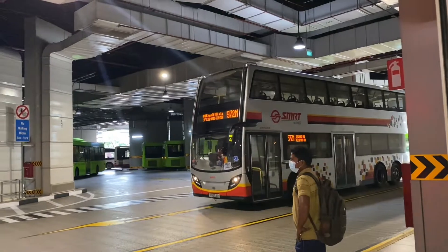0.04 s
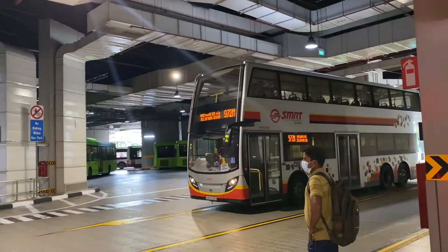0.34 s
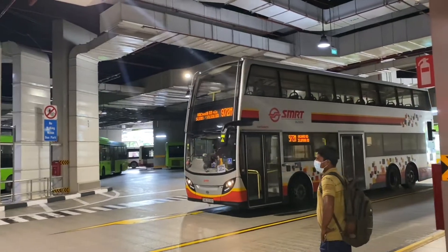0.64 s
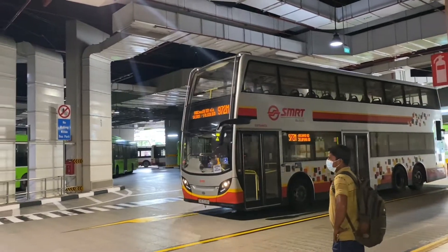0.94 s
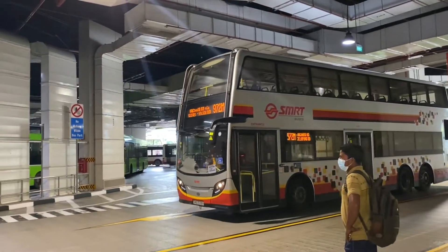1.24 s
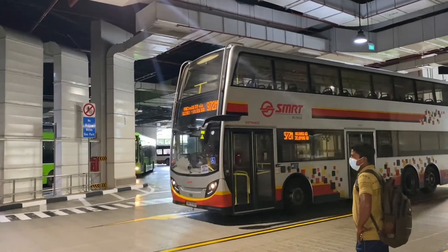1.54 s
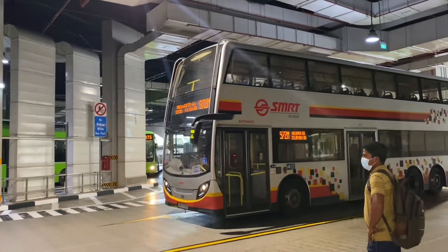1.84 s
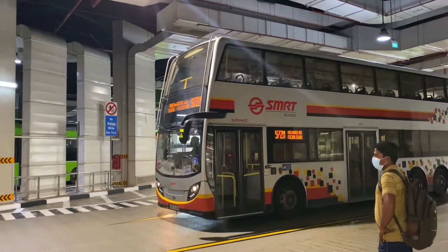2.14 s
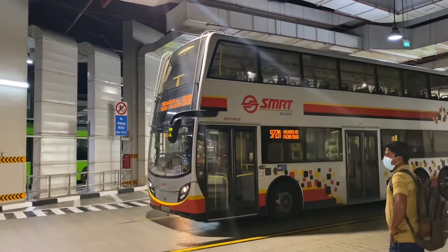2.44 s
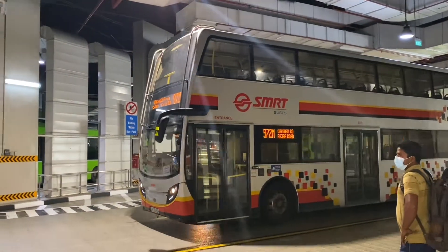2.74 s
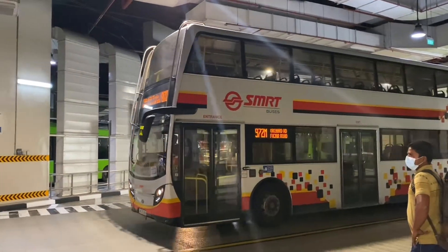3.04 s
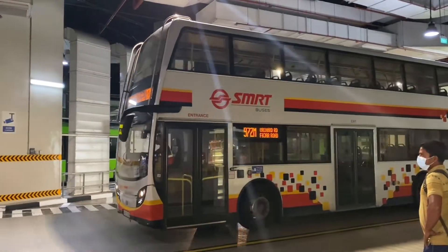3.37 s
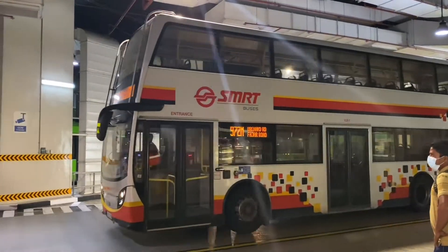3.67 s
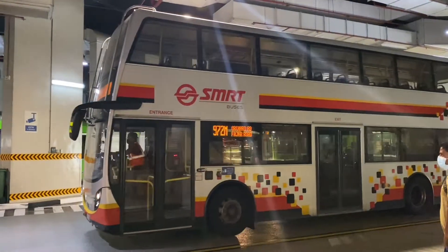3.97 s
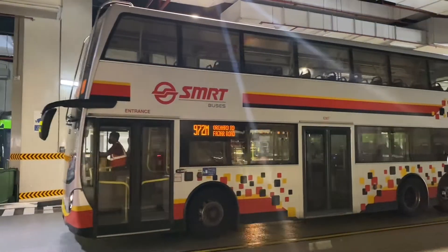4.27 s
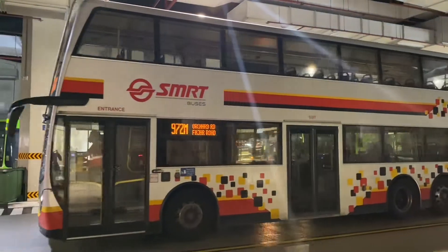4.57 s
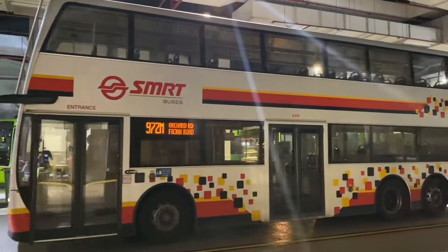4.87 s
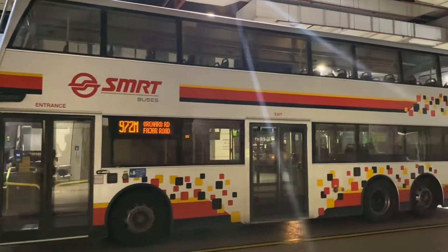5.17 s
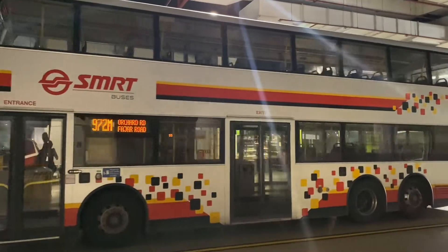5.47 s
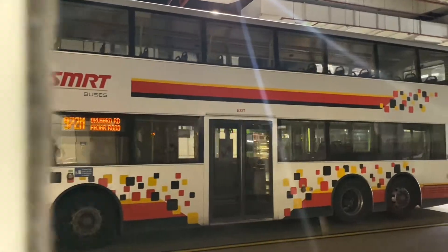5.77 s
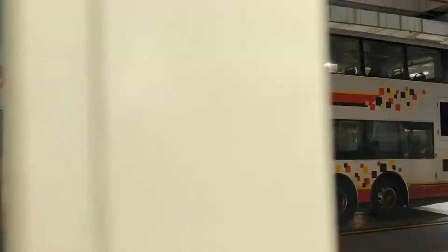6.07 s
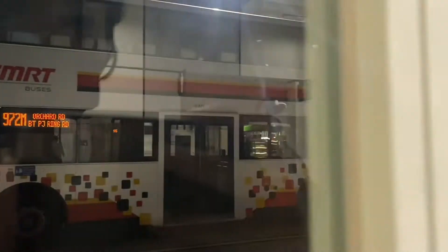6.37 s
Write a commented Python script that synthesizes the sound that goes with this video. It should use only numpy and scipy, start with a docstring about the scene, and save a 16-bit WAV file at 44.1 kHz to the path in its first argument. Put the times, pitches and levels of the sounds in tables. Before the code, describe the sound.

A large diesel bus creeps past in a covered station, droning and clattering, with hissing air and wind buffeting the microphone.

```python
"""A double-decker diesel bus creeps past in a covered concrete bus station.
From the start its firings drone and clatter over the wash of the hall, compressed air hisses on the left,
and eddies in a draught buffet the microphone in short, irregular puffs. From about 1 s a valve spits air;
after 3 s the engine gains a little speed; near 5 s the bus draws level and a thin whistle joins."""
import sys
import numpy as np
from scipy import signal
from scipy.fft import rfft, irfft, next_fast_len
from scipy.io import wavfile
from scipy.ndimage import uniform_filter1d, map_coordinates

SR = 44100
rng = np.random.default_rng(int(sys.argv[2]) if len(sys.argv) > 2 else 0)


def inscribe(sig):
    """Save sig as 16-bit PCM at rate SR to the path in sys.argv[1].

    A 1-D sig is mono; a 2-D sig holds one channel per row.
    Samples are clipped to [-1, 1] before scaling.
    """
    pcm = np.round(np.clip(np.atleast_2d(sig).T, -1, 1) * 32767)
    wavfile.write(sys.argv[1], SR, pcm.astype(np.int16))


N = 287179
t = np.arange(N) / SR

# left-right coherence of the reverberant field: f/Hz, coherence
HALL_COHERENCE = [(40, 0.6), (120, 0.66), (300, 0.91), (700, 0.15), (1400, 0.3), (2600, 0.17),
                  (5000, 0.025)]


def amp(db):
    """Amplitude ratio of a level in decibels."""
    return 10 ** (np.asarray(db) / 20)


def unit(x):
    """Normalisation to rms 1."""
    return x / np.sqrt(np.mean(x ** 2) + 1e-20)


def along(points, hz):
    """Interpolation of (f/Hz, value) points on a logarithmic frequency axis."""
    f, values = np.transpose(points)
    return np.interp(np.log(hz + 1), np.log(f + 1), values)


def curve(points):
    """Linear interpolation of (t/s, value) points at every sample."""
    return np.interp(t, *np.transpose(points))


def swells(rows):
    """Gaussian rises and dips of level, summed from rows of t/s, width/s, change/dB."""
    return sum(db * np.exp(-((t - s) / width) ** 2) for s, width, db in rows)


def wobble(rate):
    """Smooth random modulation of rms 1, with rate knots a second."""
    return unit(map_coordinates(rng.standard_normal(4096), [np.arange(N) * rate / SR], mode="wrap"))


def filtered(x, response):
    """Linear filtering: the spectrum is multiplied by a frequency response."""
    size = next_fast_len(N + SR // 4)
    return irfft(rfft(x, size) * response(np.fft.rfftfreq(size, 1 / SR)), size)[..., :N]


def pan(left_db):
    """Channel gains for a level difference, left minus right."""
    return amp(np.array([[.5], [-.5]]) * left_db)


def rush(spectrum, coherence):
    """Coloured stereo noise of rms 1; the ratio of mid to side sets its coherence."""
    def response(hz):
        angle = np.arccos(np.clip(along(coherence, hz), -1, 1)) / 2
        return amp(along(spectrum, hz)) * [np.cos(angle), np.sin(angle)]
    mid, side = filtered(rng.standard_normal((2, N)), response)
    return unit(np.array([mid + side, mid - side]))


def steady(x, size):
    """Envelope flattening: a noise is divided by its rms, smoothed over size samples."""
    power = uniform_filter1d(uniform_filter1d(np.mean(x ** 2, 0), size), size)
    return x / np.sqrt(np.abs(power) + 1e-9)


def patchy(x, depth_db):
    """Passing resonances: random narrow bands stand out for a few hundredths of a second each."""
    bands = signal.stft(x, nperseg=2048)[2]
    field = uniform_filter1d(rng.standard_normal(bands.shape[1:]), size=5, axis=0)
    field = unit(uniform_filter1d(field, size=3, axis=1))
    return unit(signal.istft(bands * amp(depth_db * field), nperseg=2048)[1][:, :N])


def hall():
    """Reverberation: tyres, fans and far buses merge into a wash under the concrete roof."""
    # spectrum of the wash: f/Hz, relative level/dB
    spectrum = [(30, -40), (90, -12), (250, 4.5), (450, -6.5), (650, -11), (850, -3), (1200, -9),
                (1800, -13), (3000, -20), (6000, -34), (12000, -58)]
    return amp(-31 + 1.45 * wobble(2.73)) * rush(spectrum, HALL_COHERENCE)


def whines():
    """Phase modulation: faint, thin, high whines waver, differently at each ear."""
    # faint tones: f/Hz, level/dB
    tones = [(3444, -55.5), (4000, -56), (7064, -65)]
    return sum(amp(db) * np.sin(2 * np.pi * hz * t + 2.2 * np.array([wobble(21), wobble(14)]))
               for hz, db in tones)


def draught():
    """Turbulence at the microphone: each eddy is a few pressure cycles in a rough flutter, over a thud."""
    # strong eddies: t/s, relative level/dB, duration/s, f/Hz, crest level re eddy/dB
    puffs = [(0.092, -27, 0.016, 220, 3), (0.156, -35, 0.007, 480, 17), (0.197, -19, 0.0082, 300, -1),
             (.293, -20.5, 0.0052, 450, -1), (.329, -14.5, 0.0048, 520, -23),
             (0.364, -12.5, 0.0083, 350, -13), (0.437, -18.5, 0.0057, 420, 0.5),
             (0.478, -16, 0.023, 280, -4), (0.559, -17, 0.0045, 520, 3), (0.582, -16.5, 0.0057, 250, 2.5),
             (0.659, -19, 0.006, 400, -12), (0.716, -25, 0.0089, 314, -14), (0.795, -19.5, 0.012, 401, -21),
             (0.978, -26, 0.015, 480, -12), (1.015, -22, 0.032, 220, -12), (1.151, -16, 0.016, 310, -17),
             (1.235, -13, 0.014, 248.5, -9), (1.321, -19, 0.0047, 560, -5),
             (1.387, -13.5, 0.008, 411.6, -1), (1.525, -29, 0.017, 339, -20),
             (1.59, -9.5, 0.0074, 349, -22), (1.67, -12.5, 0.0088, 450, -21),
             (1.696, -14.5, 0.018, 352.4, -1), (1.771, -12, 0.0074, 288.4, -2),
             (1.968, -19.5, 0.019, 239.6, -14), (2.07, -30, 0.013, 490, -16),
             (2.177, -10, 0.0021, 412, -23), (2.245, -27, 0.0077, 440, -15), (2.314, -15, 0.011, 300, -6),
             (2.52, -13.5, 0.0089, 360, -12), (2.586, -17, 0.006, 363, -15), (2.66, -27, 0.01, 480, -12),
             (2.782, -17, 0.016, 310.5, -14), (2.906, -22, .004, 600, -8), (2.926, -4.5, 0.0039, 620, -14),
             (3.037, -16.5, 0.011, 387, 1.5), (3.063, -11, 0.0054, 630, -9), (3.175, -19, 0.0046, 620, -16),
             (3.197, -16, 0.01, 430, -12), (3.282, -13, 0.0062, 279, -19), (3.475, -15.5, 0.024, 301.4, -3),
             (3.646, -26, 0.0045, 396, -12), (3.728, -16, 0.014, 280, -7), (3.775, -27, 0.0064, 520, -11),
             (3.811, 0, 0.0035, 310, -29), (3.991, -27, 0.019, 411, -16), (4.052, -20, 0.015, 367, -13),
             (4.095, -19, 0.011, 362.4, 5), (4.159, -18.5, 0.019, 260, 2), (4.241, -14, 0.005, 540, -13),
             (4.307, -34, 0.0035, 400, -13), (4.395, -13, 0.013, 385, -12), (4.471, -15, 0.0075, 480, -14),
             (4.504, -12, 0.0043, 280, -15), (4.635, -17, .008, 400, -11), (4.664, -10.5, 0.0096, 360, -9),
             (4.683, -14, 0.015, 330, 0), (4.702, -19, 0.0037, 400, -5), (4.742, -21, 0.008, 435, -15),
             (4.81, -31, 0.024, 520, -14), (4.886, -21, 0.005, 476, 2), (5.001, -16, 0.0065, 473, -11),
             (5.093, -12, .0067, 450, -12), (5.117, -7.5, 0.0064, 400, -5.5), (5.209, -32, 0.0049, 339, 1),
             (5.256, -37, 0.014, 540, -27), (5.345, -20.5, 0.018, 411, 2.5), (5.401, -22.5, 0.017, 472, 1),
             (5.561, -15.5, 0.0081, 620, 2), (5.586, -25, .005, 600, 1), (5.734, -16.5, 0.01, 371, -1),
             (5.836, -15.5, 0.009, 250, 1), (5.873, -23, 0.005, 560, 4), (5.937, -12.5, 0.018, 191, 2),
             (5.951, -13, 0.0074, 420, -7), (6.001, -24, 0.012, 355, -12), (6.066, -23, .006, 480, 1),
             (6.184, -21, 0.0036, 520, 1), (6.204, -17.5, 0.054, 265, 6), (6.321, -20, 0.0074, 426, -2),
             (6.441, -19, 0.0064, 474, -16), (6.469, -27, 0.0085, 400, -10)]
    # weak eddies between them: t/s, relative level/dB
    weak_level = [(0, -26), (.6, -31), (1.3, -33), (2.6, -33.5), (3.4, -33), (4.2, -28), (4.55, -28.5),
                  (5.3, -28.5), (6.51, -27.5)]
    # lulls in the weak eddies: t/s, width/s, change/dB
    lulls = [(.27, 0.031, -9), (.91, 0.027, -16), (1.2, 0.017, -8), (1.47, 0.019, -5), (1.64, .02, -3),
             (1.8, 0.023, -8), (2.48, 0.037, -6), (2.87, 0.036, -9), (3.32, 0.039, -5.5),
             (3.835, 0.0079, -7), (3.93, .02, -8), (4.34, 0.027, -2), (4.56, 0.052, -6.5), (4.86, .015, 2),
             (5.06, 0.028, -5), (5.17, .025, 0.5), (5.61, .02, -7.5), (5.68, 0.034, -4.5)]
    # spectra of flutter, crest and thud: f/Hz, relative level/dB
    flutter_spectrum = [(30, -43), (70, -6.5), (140, -5.5), (220, -1), (400, 1), (620, -1.5), (900, -7.5),
                        (1200, -12.5), (1600, -20.5), (2000, -25.5), (3200, -42), (7000, -74)]
    crest_spectrum = [(300, -22), (700, 6), (1000, -3.5), (1600, -6.5), (2000, -13.5), (3000, -24),
                      (6000, -59)]
    thud_spectrum = [(22, -45), (34, -32), (50, 0.5), (80, -4.5), (130, -1), (200, -6.5), (400, -28),
                     (1000, -77)]
    # likeness of the pressure at the two ports: f/Hz, coherence
    coherence = [(50, 0.98), (130, 0.78), (280, 0.89), (600, 0.61), (1000, 0.59), (1600, 0.11)]
    # the left port is struck harder: f/Hz, left minus right level/dB
    left_excess = [(100, 7.5), (300, 0), (600, 3), (1000, 3), (1500, 7), (2200, 4.5)]
    swirl = steady(rush(flutter_spectrum, coherence) * amp(1.1 * wobble(300)), size=200)
    tear = steady(rush(crest_spectrum, coherence), size=200)
    rumble = steady(rush(thud_spectrum, coherence), size=700)
    gusts = unit(amp(4.06 * np.tanh(wobble(55)) + 4.95 * np.tanh(wobble(170))))
    weak = amp(curve(weak_level) + swells(lulls) + 5) * gusts
    flutter_power, thud_power, cycles, crest = np.zeros((4, N))
    for s, db, duration, hz, crest_db in puffs:
        near = slice(max(0, int((s - .1) * SR)), int((s + .1) * SR))
        age = t[near] - s
        # an eddy arrives faster than it leaves, and its pitch sinks as it passes
        spread = np.abs(age / duration * np.where(age < 0, 1.9, 1.3))
        shape = np.exp(-(age / 0.07) ** 2) / (1 + spread ** 3)
        turns = np.cumsum(hz * (1 - 0.1402 * np.tanh(age / duration))) / SR
        cycles[near] += amp(db - 5.5) * shape * np.cos(2 * np.pi * (turns + rng.random()))
        # strong or low-pitched eddies have a smaller share of flutter
        flutter_db = -11.5 + 0.48 * db + 4 * np.log2(hz / 350)
        flutter_power[near] += (amp(flutter_db) * shape) ** 2
        thud_power[near] += amp(-18 + 0.21 * db) ** 2 * np.exp(-((age - .002) / 0.0093) ** 2)
        # only at its crest does the flow tear into treble
        crest[near] += amp(db + crest_db) * np.exp(-(age / 0.0016) ** 2)
    body = np.sqrt(flutter_power + weak ** 2) * swirl + cycles + crest * tear
    thud = np.sqrt(thud_power + weak ** 2 * amp(0.5)) * rumble

    def crossing(hz):
        """Phase lead: the flow reaches the left port first."""
        lead = np.pi * np.clip(hz - 200, 0, 1100) * 0.00026
        return pan(along(left_excess, hz)) * np.exp(np.array([[1j], [-1j]]) * lead)
    return filtered(body, crossing) + thud * pan(left_db=-0.3)


def booms():
    """Wave packets: the largest, slowest eddies press on both ports as a few deep, sinking cycles."""
    # large eddies: t/s, relative level/dB, width/s, f/Hz
    eddies = [(.078, -18.5, 0.026, 106), (.811, -10.5, 0.022, 102.8), (1.037, -16, 0.051, 86.1),
              (1.158, -14.5, 0.028, 110), (1.39, -13, .03, 70.7), (1.69, -14, 0.021, 79.8),
              (1.97, -23, .03, 67.8), (2.25, -23, 0.037, 66), (2.37, -21, 0.067, 65.8),
              (2.55, -15, 0.04, 63.5), (2.691, -13, 0.026, 97.6), (2.935, -15, 0.029, 106),
              (3.055, -16, 0.032, 91.4), (3.464, -17, 0.043, 99.4), (3.629, -16, 0.031, 82),
              (3.69, -17.5, 0.15, 42.8), (3.737, -10, 0.037, 69.7), (4.206, -14.5, 0.035, 92.7),
              (4.52, -24, 0.02, 90.8), (4.668, -9, 0.027, 61.2), (5.009, -20, 0.023, 103.2),
              (5.221, -15, 0.018, 108), (5.335, -19, .02, 159.6), (5.558, -4.5, 0.0097, 232),
              (5.843, -13.5, 0.018, 100.4), (5.933, -10, 0.012, 124), (6.187, -17, 0.029, 100),
              (6.441, -18, 0.034, 76.2)]
    pitch_sag = 0.1508
    pressure = np.zeros(N)
    for (s, db, width, hz), start_turn in zip(eddies, rng.random(len(eddies))):
        near = slice(max(0, int((s - .2) * SR)), int((s + .2) * SR))
        passage = (t[near] - s) / width
        turns = np.cumsum(hz * (1 - pitch_sag * np.tanh(passage))) / SR
        pressure[near] += amp(db) * np.exp(-passage ** 2) * np.cos(2 * np.pi * (turns + start_turn))
    return amp(-3.5) * pressure * pan(left_db=2.5)


def cracks():
    """Transients: where an eddy breaks, the pressure flips through a few fast cycles."""
    # breaking eddies: t/s, level/dB, f/Hz
    breaks = [(0.154, -20.5, 1500), (1.387, -30, 1500), (2.925, -25, 1310), (3.067, -23, 1450),
              (4.678, -19, 1500), (5.1153, -15.5, 1450), (5.565, -23, 1750), (5.94, -16, 1330)]
    width_s = .0014
    pressure = np.zeros(N)
    for (s, db, hz), start_turn in zip(breaks, rng.random(len(breaks))):
        near = np.abs(t - s) < .02
        age = t[near] - s
        envelope = amp(db) * np.exp(-(age / width_s) ** 2)
        pressure[near] += envelope * np.cos(2 * np.pi * (hz * age + start_turn))
    return pressure * pan(left_db=5)


def compressed_air():
    """Jet noise: air leaks under the body and spits from a valve; a sizzle and a whistle sound with it."""
    # spectra of leak, valve and a thin, high sizzle: f/Hz, relative level/dB
    leak_spectrum = [(1500, -36), (3000, 0), (4200, 4.5), (5200, 3.5), (6100, 1), (7000, -2.5), (8300, -15),
                     (12000, -73)]
    valve_spectrum = [(2000, -30), (3200, -4), (4250, 0), (4900, 0), (5600, 4), (6150, 4), (6700, 2.5),
                      (7100, -1), (8300, -9.5), (12000, -45)]
    sizzle_spectrum = [(3000, -7), (6000, 3), (8000, -10), (9500, 25.5), (11300, 19), (12200, -32),
                       (15000, 12.5)]
    # valve releases: t/s, hold/s, level/dB
    releases = [(1.112, .06, -42.5), (1.29, 0.087, -45), (1.827, .14, -48.5), (1.98, 0.036, -44.5),
                (2.142, 0.53, -51.5), (3.927, 0.2, -45.5), (4.773, 0.041, -47), (5.2, 1.15, -53.5),
                (6.008, .03, -46.5)]
    # brief rises of the sizzle: t/s, width/s, rise/dB
    rises = [(2.3, .1, 5), (6.05, .05, 2), (6.3, 0.15, 0)]
    # strength of the whistle: t/s, level/dB
    whistle_level = [(4.7, -80), (5, -61), (5.25, -55), (5.42, -48), (5.75, -53), (6.05, -48), (6.51, -55)]
    whistle_band = [(4300, -50), (4850, -1), (5120, 8), (5420, -4), (6000, -50)]  # f/Hz, level/dB
    open_s, close_s = 0.012, 0.12
    valve_power = np.zeros(N)
    for s, hold, db in releases:
        opening = np.clip((t - s) / open_s, 0, 1)
        closing = np.exp(-np.maximum(t - s - hold, 0) / close_s)
        valve_power += (amp(db) * opening * closing) ** 2
    alongside = .5 + .5 * np.tanh((t - 5.02) / .1)  # the sizzle grows as the bus draws level
    sizzle_db = -54 + 3 * alongside + swells(rises)
    leak = amp(-45 + 0.92 * wobble(30)) * rush(leak_spectrum, coherence=[(4000, 0.18)])
    spit = np.sqrt(valve_power) * amp(1.8 * wobble(30)) * rush(valve_spectrum, coherence=[(4000, 0.27)])
    sizzle = amp(sizzle_db + 0.69 * wobble(40)) * rush(sizzle_spectrum, coherence=[(6000, 0.16)])
    whistle = amp(curve(whistle_level) + 1.2 * wobble(12)) * rush(whistle_band, coherence=[(5000, .1)])
    return leak * pan(left_db=7.5) + spit * pan(left_db=8.5) + sizzle + whistle


def exhaust(phase, above_idle_hz):
    """Harmonic series: the pipe radiates three orders of the firing rate; the hall smears a drone."""
    # deep throb at the firing rate: t/s, relative level/dB
    throb_level = [(0, -14), (.25, -21), (.45, -42), (1.4, -46), (1.95, -14), (2.17, -39), (3.1, -24),
                   (6.51, -17)]
    # spectrum of the drone: f/Hz, relative level/dB
    spectrum = [(20, -45), (30, -5), (42, 6.5), (65, 1), (110, 2), (170, -8.5), (260, -9.5), (600, -20),
                (1500, -70)]
    # swells of the drone: t/s, width/s, rise/dB
    surges = [(1.08, 0.13, 4.5), (3.55, 0.2, 3.5), (4.7, 0.1, 5)]
    drone_db = -28 - 0.2 * above_idle_hz + swells(surges)
    pipe = np.zeros(N)
    for order, db in [(1, curve(throb_level) - 10.5), (2, drone_db - 2.5), (3, drone_db - 8.5)]:
        # reflections make each order swell, fade and drift as the bus moves
        fading = amp(5.9 * np.tanh(wobble(11)))
        pipe += amp(db) * unit(fading * np.sin(order * phase + 0.61 * wobble(8.3)))
    drone = amp(drone_db) * steady(rush(spectrum, HALL_COHERENCE), size=2200)
    return pipe + drone * pan(left_db=1.5)


def clatter(phase, above_idle_hz):
    """Panel resonance: the block rattles with each firing; sheet-metal covers ring in a narrow band."""
    # spectra of block and covers: f/Hz, relative level/dB
    block_spectrum = [(300, -22), (900, 5), (1500, 5.5), (2000, 2.5), (2350, 3), (2650, -2.5), (3000, -5),
                      (4000, -11), (5500, -29.5), (9000, -26)]
    cover_spectrum = [(2200, -44), (2520, -2), (2615, 7), (2680, 3.5), (2770, 0), (3100, -50)]
    # ring of the covers: t/s, level/dB
    ring_level = [(0, -40), (.33, -56), (.53, -41), (.8, -49), (1.1, -45), (1.8, -46.5), (2.06, -42),
                  (2.2, -51), (2.5, -45), (2.75, -48), (2.95, -46), (3.15, -50), (3.5, -39.5), (3.8, -43),
                  (4.1, -43.5), (4.38, -59), (4.66, -42), (4.85, -52), (5.1, -45), (6.51, -47)]
    knock = amp(np.cos(phase) + 1.07 * wobble(45))
    ring_db = curve(ring_level) + 0.57 * wobble(15)
    ring = amp(ring_db) * patchy(rush(cover_spectrum, HALL_COHERENCE), depth_db=2.5)
    panels = patchy(rush(block_spectrum, HALL_COHERENCE), depth_db=2.5)
    rattle = amp(-36 + 0.46 * above_idle_hz) * unit(knock * panels)
    return (rattle + ring) * pan(left_db=-2)


def engine():
    """Periodic excitation: the cylinders fire in turn and drive both exhaust and clatter."""
    # firing rate of the crawling engine: t/s, f/Hz
    firing_rate = [(0, 33.27), (1.6, 32.78), (3.1, 32.66), (3.9, 33.76), (4.5, 35.1), (5, 36.51),
                   (6.51, 37.74)]
    firing_hz, idle_hz = curve(firing_rate), 33.3
    phase = 2 * np.pi * np.cumsum(firing_hz * (1 + 0.019 * wobble(11))) / SR
    return exhaust(phase, firing_hz - idle_hz) + clatter(phase, firing_hz - idle_hz)


def scene():
    """Superposition: the pressures of bus, hall and draught add."""
    return engine() + compressed_air() + whines() + hall() + draught() + booms() + cracks()


def record(dry):
    """Band limiting and saturation: the microphone drops the extreme bass and treble and rounds peaks."""
    low_hz, top_hz, ceiling = 37.3, 15400, .95
    heard = filtered(dry, lambda hz: 1 / np.sqrt(1 + (low_hz / (hz + 1)) ** 22))
    rounded = heard / (1 + np.abs(heard / ceiling) ** 6) ** (1 / 6)
    return filtered(rounded * signal.windows.tukey(N, .001), lambda hz: hz < top_hz)


dry = scene()
out = record(dry)
inscribe(out)
```